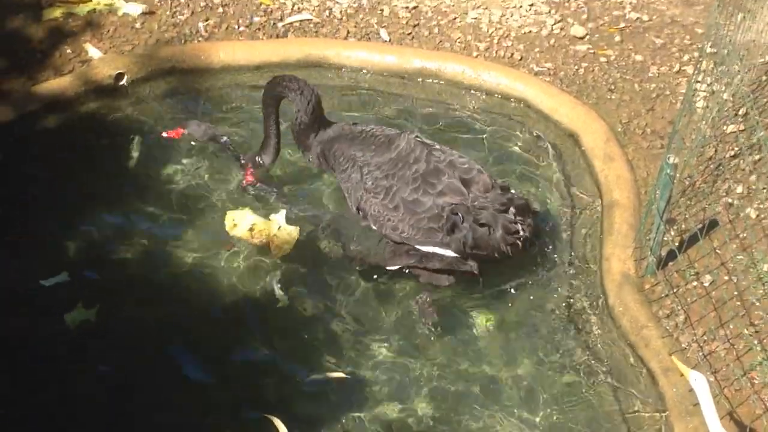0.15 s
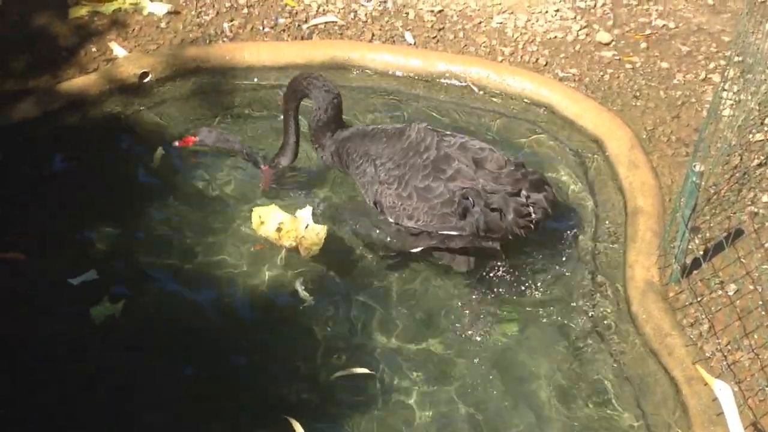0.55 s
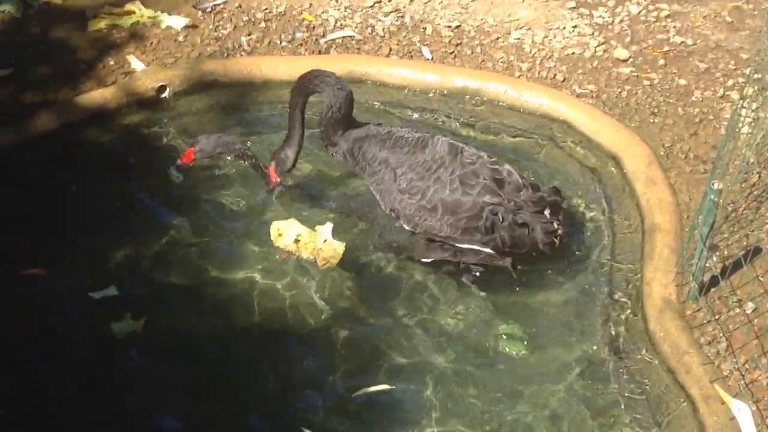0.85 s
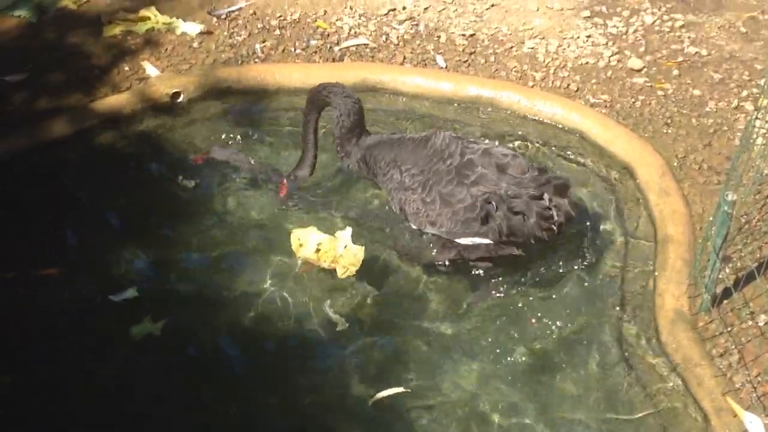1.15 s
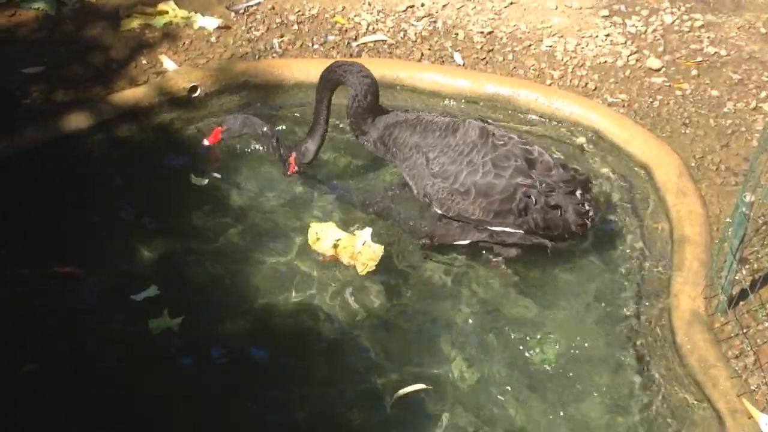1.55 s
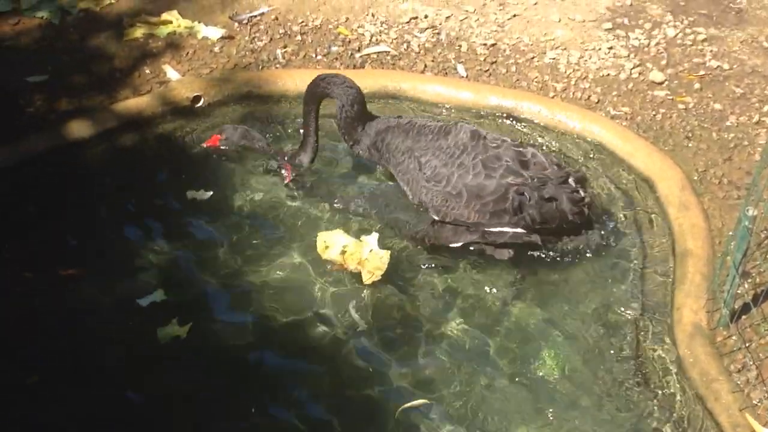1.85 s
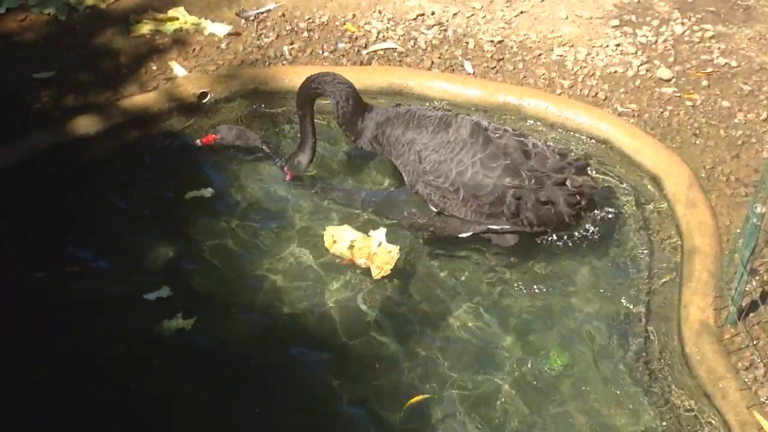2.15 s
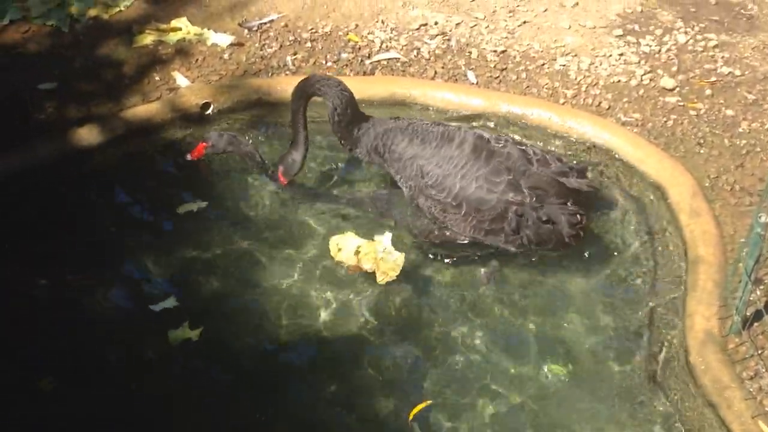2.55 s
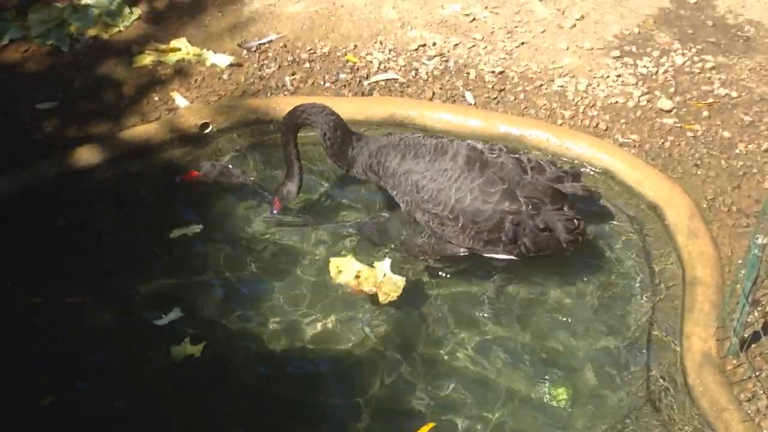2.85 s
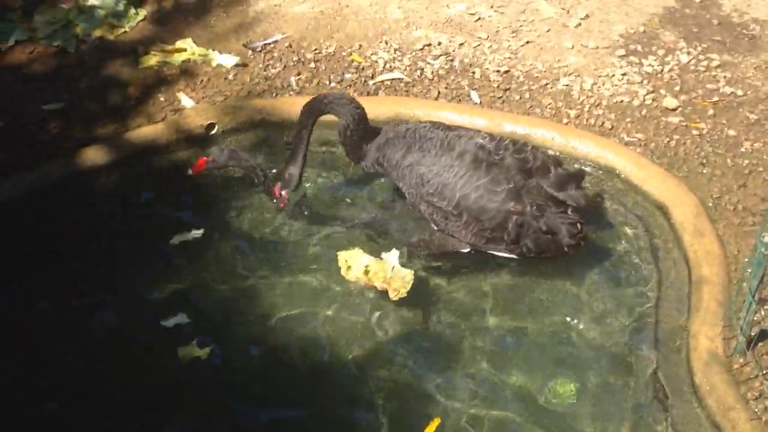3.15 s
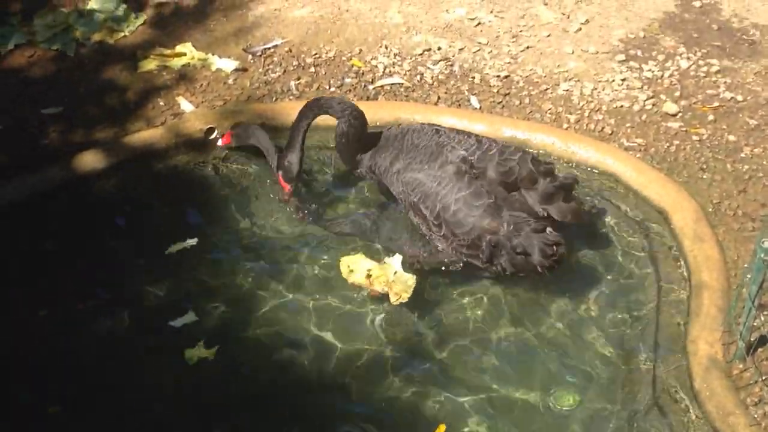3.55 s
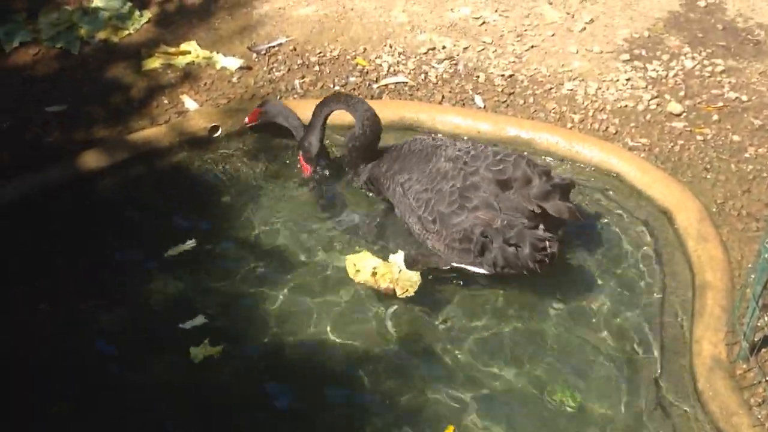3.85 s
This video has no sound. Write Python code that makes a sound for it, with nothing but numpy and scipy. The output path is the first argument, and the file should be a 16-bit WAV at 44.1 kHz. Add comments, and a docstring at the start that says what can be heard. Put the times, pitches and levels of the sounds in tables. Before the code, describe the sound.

Water splashing, dripping and glugging in a small pond, then a swan's hoarse bugling call near the end

```python
"""Over a low wavering rumble and outdoor hiss, a small pond spits and plips, and large air pockets glug.
Glugs are dying sines that climb in pitch; drops add splash noise, a knock into ringing hollows and treble.
Near the end a swan bugles: fluttering harmonics with a rasp of air, breaking up to a higher note.
Air and rumble are shaped noise; a low cut and a high cut finish the sound."""
import sys
import numpy as np
from scipy import signal
from scipy.io import wavfile
from scipy.ndimage import uniform_filter1d

SR = 44100
rng = np.random.default_rng(int(sys.argv[2]) if len(sys.argv) > 2 else 0)


def dump(signal):
    """Clip the signal to [-1, 1] and save it as 16-bit WAV at the path in sys.argv[1]."""
    limited = np.clip(np.atleast_2d(signal).T, -1, 1)
    pcm = np.round(limited * 32767).astype(np.int16)
    wavfile.write(sys.argv[1], SR, pcm)


N = 176400  # 4 s

START_SHARE = 0.96  # a bubble starts at this share of its nominal pitch


def gain_of(db):
    """Decibels to gain."""
    return 10 ** (np.asarray(db) / 20)


def evened(x):
    """Scales to rms 1."""
    return x / np.sqrt(np.mean(x ** 2) + 1e-20)


def add(mix, start_s, sound):
    """Mixes a sound in at its start time, cut off at the end of the mix."""
    part = mix[max(round(start_s * SR), 0):][:len(sound)]
    part += sound[:len(part)]


def resonate(x, hz, width_hz):
    """A resonance that follows the curve hz: shift down to zero, smooth with one pole, shift back."""
    turn = np.exp(2j * np.pi * np.cumsum(hz * np.ones(len(x))) / SR)
    r = np.exp(-np.pi * width_hz / SR)
    smoothed = signal.lfilter([1 - r], [1, -r], x / turn + 1e-18)
    return 2 * (turn * smoothed).real


def drift(n, span_s):
    """Smooth random motion of rms 1: noise averaged twice over the span."""
    k = max(int(span_s * SR), 2)
    return evened(uniform_filter1d(uniform_filter1d(rng.standard_normal(n), k), k))


def read_spectrum(points, hz):
    """Reads a level curve on a log-frequency axis."""
    point_hz, level_db = np.transpose(points)
    return np.interp(np.log(hz + 1), np.log(point_hz), level_db)


def scatter(per_s, spread_db):
    """Random start samples, extra levels in dB (mostly small) and three spare chances each."""
    u = rng.random((int(per_s * N / SR), 5))
    extra_db = -spread_db * np.log(1 - .98 * u[:, 1])
    return u[:, 0] * N / SR, extra_db, u[:, 2:]


def bubble(db, hz, t60, octaves_per_s, rise_s):
    """A dying sine whose pitch climbs as the pocket nears the surface, until it bursts."""
    t = np.arange(0, t60 * 0.53 + 0.005, 1 / SR)
    pitch_hz = np.minimum(START_SHARE * hz * 2 ** (octaves_per_s * t), SR / 3)
    fade_out = np.minimum(4 * (1 - t / t[-1]), 1)  # over the last quarter
    shape = (1 - np.exp(-t / rise_s)) * fade_out
    return shape * gain_of(db + 5 - 60 * t / t60) * np.sin(2 * np.pi * np.cumsum(pitch_hz) / SR)


def fizz(db, hz, t60, octaves_per_s):
    """A tiny splash: a noisy blip whose pitch slides up."""
    t = np.arange(900) / SR
    rough = uniform_filter1d(rng.standard_normal(900), size=30) * 5
    pitch_hz = hz * 2 ** (octaves_per_s * t)
    return gain_of(db - 60 * t / t60) * (.5 + rough) * np.sin(2 * np.pi * np.cumsum(pitch_hz) / SR)


def burst(db, t60):
    """A short spit of dying noise."""
    t = np.arange(2000) / SR
    return gain_of(db - 60 * t / t60) * rng.standard_normal(2000)


def hollow(x):
    """The resonances of the basin that splashes excite, each a pair of filters in series."""
    # ringing modes of the basin: (pitch_hz [Hz], width_hz [Hz], relative level_db [dB])
    basin_modes = [(1629, 340, 0), (2560, 210, -9.5), (3440, 1300, -2.5), (3780, 260, -5.5),
                   (8050, 520, -10.5)]
    out = 0
    for hz, width_hz, db in basin_modes:
        ring = resonate(resonate(x, hz, 0.5 * width_hz), hz, 0.5 * width_hz)
        out += gain_of(db) * ring * np.sqrt(2000 / width_hz)  # narrow modes pass less noise
    return out


def air():
    """Outdoor hiss in patches that drift over time and frequency, and a low wavering rumble."""
    # colour of the hiss: (pitch_hz [Hz], relative level_db [dB])
    hiss_curve = [(15, -32), (25, -64), (76, 9.5), (242, -9.5), (463, 3), (641, -11.5), (988, -17),
                  (1560, -18), (2840, -31), (3920, -23), (4740, -25.5), (14400, -27), (16000, -10)]
    # narrow noise bands of the rumble: (pitch_hz [Hz], width_hz [Hz], rms level_db [dB])
    rumble_bands = [(74.8, 11.7, -57.5), (112.1, 7.5, -62.5)]
    hiss_db, patch_db = -47.5, 2.0  # rms levels
    frames, hz = N // 256 + 5, np.fft.rfftfreq(1024, 1 / SR)
    real, imaginary, patches = rng.standard_normal((frames, 513, 3)).T
    patches = evened(uniform_filter1d(uniform_filter1d(patches, 20, 0), 8, 1))
    level_db = read_spectrum(hiss_curve, hz)[:, None] + patch_db * patches
    spectrum = (real + 1j * imaginary) * gain_of(level_db)
    hiss = signal.istft(spectrum, nperseg=1024, noverlap=768)[1][:N]
    out = gain_of(hiss_db) * evened(hiss)
    for band_hz, width_hz, db in rumble_bands:
        out += gain_of(db) * evened(resonate(rng.standard_normal(N), band_hz, width_hz))
    return out


def plips():
    """Drops: a brief bubble in a noisy blip, a knock into the hollow, a tick and a spit of treble."""
    # placed drops: (start_s [s], level_db [dB], pitch_hz [Hz], treble spit_db [dB re level])
    drops = [(0.0295, -39, 1755, -9), (0.4675, -43.5, 1660, 4), (0.504, -34.5, 1570, -14),
             (0.6563, -42.5, 1960, 0), (0.7206, -40, 1950, -30), (0.7672, -39, 2500, -4),
             (0.815, -39, 5770, -8), (0.982, -47, 3018, -17), (1.0492, -42, 1580, -24),
             (1.0594, -41.5, 3480, -16), (1.2247, -35.5, 1680, -0.5), (1.2508, -41.5, 3860, 4),
             (1.3677, -35, 1560, -30), (1.4173, -39.5, 3440, -2.5), (1.4574, -41, 3190, -10),
             (1.5972, -41, 4020, -0.5), (1.6619, -32.5, 1640, -11.5), (1.6963, -48, 1640, 6),
             (1.7453, -38, 1850, -32), (1.8253, -51, 1530, 6), (1.853, -43, 1474, 2),
             (1.9855, -38, 1666, -36), (1.9987, -39.5, 1890, -7.5), (2.0883, -46.5, 3980, 1),
             (2.2874, -48, 3640, -26), (2.3534, -43, 3320, -22), (2.4332, -40, 1600, 5),
             (2.5077, -43.5, 3430, -1), (2.5793, -41.5, 1630, 1), (2.6367, -44.5, 3500, -26),
             (3.1526, -49, 1520, -16), (3.1882, -38, 3870, -15), (3.302, -39, 1617, -5),
             (3.693, -36, 1610, 0), (3.728, -35.5, 1540, -25)]
    blip_db, rise_s, glide = 1, 0.00063, 7.9  # bubble level re drop [dB], rise [s], climb [octaves/s]
    knock_db, knock_t60, tick_db = 1, 0.049, 7.5  # levels re drop [dB], decay [s]
    small_per_s, small_db, small_hz = 260, -59, 1714
    spits_per_s, spit_base_db, spit_t60, ring_db = 200, -54, 0.022, -55
    airy_db = 1  # lift of the highest spray
    out, knock = np.zeros(N), np.zeros(N)
    tick, spit, spray = np.zeros((3, N))
    for s, db, hz, spit_db in drops:
        bubble_hz = hz / START_SHARE  # so the bubble starts at hz
        add(out, s, bubble(db + blip_db, bubble_hz, 0.0079 * 2000 / hz + 0.016, glide, rise_s))
        add(out, s, fizz(db - 4.5, hz, 0.046, 29.7))
        add(knock, s, burst(db + knock_db, knock_t60))
        add(tick, s, burst(db + tick_db + .2 * spit_db, 0.012))
        add(spit, s, burst(db + spit_db + 3.0, spit_t60))
        add(spray, s, burst(db + spit_db - 3.5, spit_t60))
    # one steeply rising chirp
    add(out, 0.716, bubble(-35.5, 1458, t60=0.047, octaves_per_s=85, rise_s=0.0027))
    # small splashes; a fifth of them are an octave lower and softer
    for s, db, (a, b, c) in zip(*scatter(small_per_s, 5.3)):
        low = c < .2
        hz = small_hz * 2 ** (1.5 * a ** 2 - .2 - low)
        add(out, s, fizz(small_db + db - 8 * low, hz, .012 + 0.051 * b, 70 * c ** 2))
    # small spits, each leaning to the middle or the highest treble
    for s, db, (a, b, c) in zip(*scatter(spits_per_s, 5.62)):
        add(spit, s, burst(spit_base_db + db - 18 * b, spit_t60 * (0.33 + 1.18 * a)))
        add(spray, s, burst(spit_base_db + db - 18 * (1 - b), spit_t60 * (0.67 + 0.51 * a)))
        add(knock, s, burst(ring_db + db + 8 * c, 0.014 + 0.0075 * a))
    out += hollow(knock)
    layers = [(tick, (1400, 4800)), (spit, (4500, 9000)), (spray * gain_of(airy_db), (9000, 17000))]
    for noise, band_hz in layers:
        out += signal.sosfilt(signal.butter(2, band_hz, "band", fs=SR, output="sos"), noise)
    return out


def glugs():
    """Large air pockets as rising bubbles, the loud ones placed and small ones at random."""
    # large bubbles: (start_s [s], level_db [dB], nominal pitch_hz [Hz], t60_s [s])
    large_bubbles = [(0.226, -31.5, 425, 0.05), (0.505, -31, 408, 0.067), (0.562, -28.5, 390, 0.041),
                     (0.613, -31, 474, 0.048), (0.671, -27, 384, 0.052), (0.736, -33.5, 543, 0.061),
                     (0.757, -34.5, 384, 0.078), (0.838, -39, 520, 0.065), (0.86, -34.5, 397, 0.061),
                     (0.98, -31.5, 380, 0.079), (1.06, -32.5, 497, 0.039), (1.117, -34, 376, 0.039),
                     (1.171, -22.5, 433, 0.057), (1.222, -38, 360, 0.051), (1.438, -21, 431, 0.042),
                     (1.518, -29.5, 519, 0.032), (1.539, -35.5, 373, 0.053), (1.684, -41.5, 425, 0.13),
                     (1.702, -33.5, 299.4, 0.095), (1.772, -35.5, 425, 0.053), (1.943, -37.5, 356, 0.079),
                     (1.964, -35, 462, 0.093), (2.031, -36, 486, 0.038), (2.268, -29, 402, 0.045),
                     (2.287, -29, 490, 0.04), (2.393, -34, 470, 0.029), (2.431, -31.5, 390, 0.045),
                     (2.506, -31.5, 474, 0.04), (2.577, -38, 544, 0.07), (2.584, -31, 347, 0.066),
                     (2.635, -35, 395, 0.081), (2.679, -36, 414, 0.043), (2.841, -29.5, 492, 0.038),
                     (2.868, -36.5, 430, 0.056), (3.074, -28, 413, 0.06), (3.155, -37.5, 542, 0.036),
                     (3.365, -26.5, 419, 0.042), (3.464, -35, 512, 0.051), (3.492, -30.5, 376, 0.045),
                     (3.573, -30, 440, 0.023), (3.657, -42, 264, 0.17), (3.73, -33, 475, 0.039),
                     (3.823, -38, 386, 0.06)]
    glide, rise_s = 17.16, 0.0026  # climb [octaves/s], rise [s]
    small_per_s, small_db, small_hz = 36, -49.5, 394.3
    out = np.zeros(N)
    for s, db, hz, t60 in large_bubbles:
        add(out, s, bubble(db, hz, t60, glide, rise_s))
    # higher small glugs are softer and tend to die sooner
    for s, db, (a, b, c) in zip(*scatter(small_per_s, 2.6)):
        level_db = small_db + db - 9 * a ** 3
        hz = small_hz * 2 ** (1.6 * a ** 1.486 - .4)
        add(out, s, bubble(level_db, hz, 0.06 + 0.13 * b * (1 - a), 30 * c - 4, rise_s))
    return out


def swan():
    """Harmonics on one pitch that flutter together and apart, each with a rasp of air."""
    # the call: (start_s [s], then levels [dB] h1_db, h2_db, h3_db, upper_db for harmonics 4-10)
    call = [(3.35, -47, -56, -74, -84), (3.405, -47, -49, -65, -86), (3.435, -33, -51, -73, -80),
            (3.455, -48, -35, -48, -68), (3.469, -31, -44, -50, -66), (3.501, -41, -52, -51, -69),
            (3.515, -31.5, -50, -29.5, -52), (3.54, -42.5, -47, -47.5, -75), (3.565, -37, -56, -34, -53),
            (3.59, -37, -37.5, -40, -60), (3.618, -40.5, -37.5, -26, -38.5), (3.64, -37, -40, -34.5, -50.5),
            (3.675, -36, -33.5, -31.5, -45.5), (3.705, -36.5, -36.5, -35.5, -52),
            (3.72, -34, -34, -58, -56), (3.732, -33.5, -27, -36, -57), (3.745, -43, -31, -27.5, -57),
            (3.76, -41.5, -53, -37, -47.5), (3.772, -27.5, -42, -53, -48), (3.786, -34.5, -24, -36.5, -51),
            (3.817, -36, -33, -26.5, -32.5), (3.83, -35.5, -32, -33, -46), (3.848, -31, -30.5, -24.5, -43),
            (3.87, -32.5, -30.5, -37, -44), (3.887, -31, -28.5, -16.5, -44), (3.905, -33, -30.5, -37, -49),
            (3.921, -30, -31, -20.5, -56), (3.939, -33, -35, -32.5, -39.5), (3.952, -33, -26.5, -27, -45),
            (3.98, -34, -35, -32, -44), (3.995, -36.5, -24, -29.5, -45)]
    # pitch of the call, breaking upward: (start_s [s], pitch_hz [Hz])
    pitch_curve = [(3.34, 960), (3.54, 957), (3.6, 980), (3.71, 1006), (3.735, 1033), (3.758, 1050),
                   (3.768, 1118), (3.79, 1140), (3.82, 1147), (3.97, 1144), (4, 1158)]
    # the windpipe's colour for harmonics 4-10: (pitch_hz [Hz], relative level_db [dB])
    throat = [(3900, 0), (4600, 0), (4790, -9), (4930, 3), (5700, -25), (5950, -7), (6400, 0), (6900, -24),
              (9000, -20), (11500, -28)]
    # hoarseness, strong at the start and at the break, before each harmonic's own weighting:
    # (start_s [s], rasp_db [dB re tone], flutter_db [dB])
    hoarseness = [(3.34, -11, 2.2), (3.56, -13, 2.2), (3.63, -14, 1.2), (3.7, -17, 1.2), (3.75, -10, 1.5),
                  (3.79, -25, 1.7), (4, -26, 1.7)]
    wobble = .003  # rms share of pitch
    patchy = 2.36  # flutter weight of the harmonics above the fourth
    flip_s, flip_length_s, flip_hz, flip_db = 3.714, 0.032, 1144, -28.5
    s, *levels = np.transpose(call)
    t = np.arange(s[0], N / SR, 1 / SR)
    pitch_hz = uniform_filter1d(np.interp(t, *np.transpose(pitch_curve)), size=150)
    pitch_hz = pitch_hz * (1 + wobble * drift(len(t), 0.0066))
    at, *hoarse = np.transpose(hoarseness)
    rasp_db, flutter_db = (np.interp(t, at, v) for v in hoarse)
    tone_db = [np.interp(t, s, v) for v in levels]
    tone_db = tone_db[:3] + [tone_db[3] + read_spectrum(throat, k * pitch_hz) for k in range(4, 11)]
    phase = 2 * np.pi * np.cumsum(pitch_hz) / SR
    throb = drift(len(t), 0.0046)  # shared by all harmonics
    voice = 0
    for k, level_db in enumerate(tone_db, 1):
        rasp = resonate(rng.standard_normal(len(t)), k * pitch_hz, 240)
        rasp = evened(resonate(rasp, k * pitch_hz, 410))
        weight = patchy if k > 4 else min(0.3 + 0.51 * k, 1.6)
        motion = np.minimum(0.74 * throb + 1.42 * drift(len(t), 0.0071), 1.3)
        flutter = flutter_db * weight * motion
        tone = np.sqrt(2) * np.sin(k * phase + k * k)
        voice += gain_of(level_db + flutter) * (tone + gain_of(rasp_db + 2.1 * k) * rasp)
    out = np.zeros(N)
    # the upper note flickers in before the break
    u = np.arange(0, flip_length_s, 1 / SR)
    swell = np.sin(np.pi * u / flip_length_s)
    add(out, flip_s, gain_of(flip_db) * swell * np.sin(2 * np.pi * flip_hz * u))
    add(out, s[0], voice * np.minimum((t - s[0]) / 0.0065, 1))
    return out


def scene():
    """Air, water and swan in one channel."""
    return (air() + plips() + glugs() + swan())[None]


def record(dry):
    """The low cut and band limit of the recorder."""
    edge_hz = 15250
    dry = signal.sosfilt(signal.butter(2, 32, "high", fs=SR, output="sos"), dry)
    high_cut = signal.firwin(601, edge_hz, window=("kaiser", 4), fs=SR)
    return signal.oaconvolve(dry, high_cut[None], "same")


dry = scene()
out = record(dry)
dump(out)
```